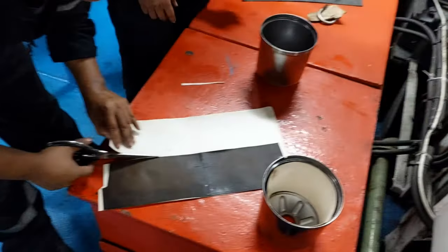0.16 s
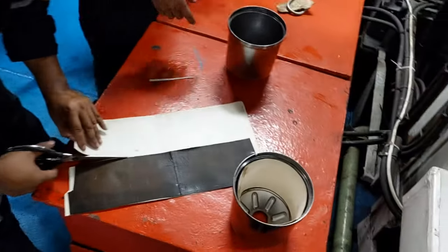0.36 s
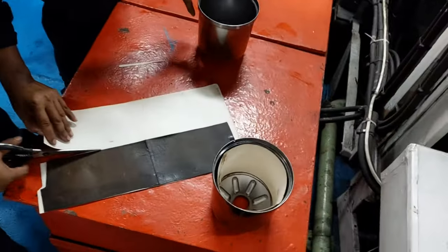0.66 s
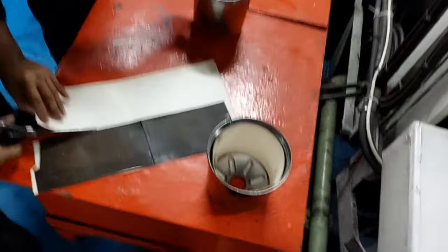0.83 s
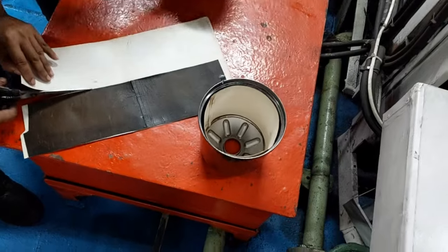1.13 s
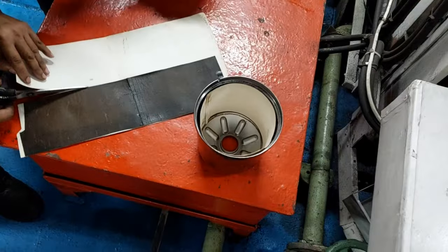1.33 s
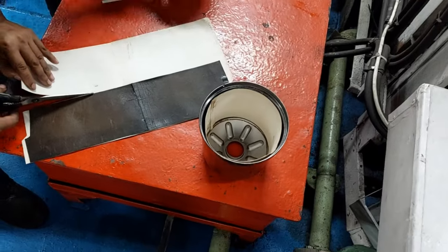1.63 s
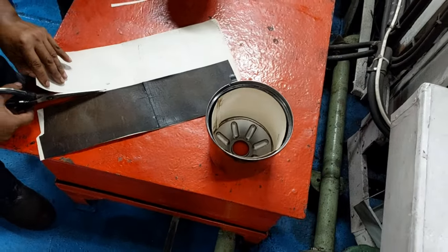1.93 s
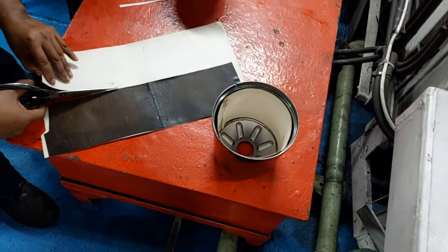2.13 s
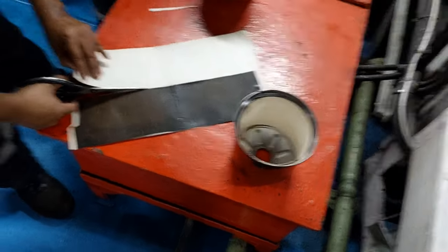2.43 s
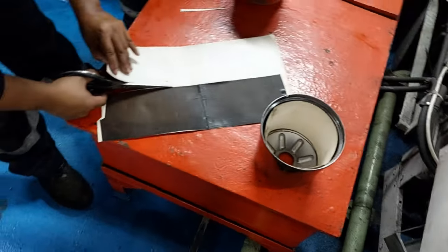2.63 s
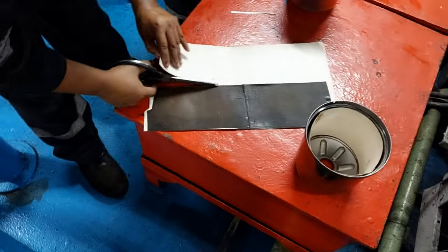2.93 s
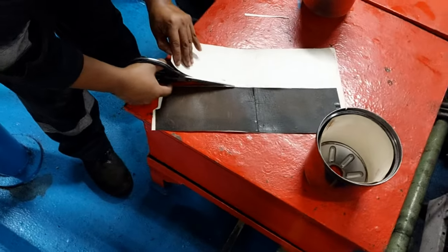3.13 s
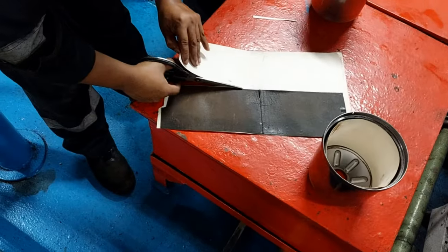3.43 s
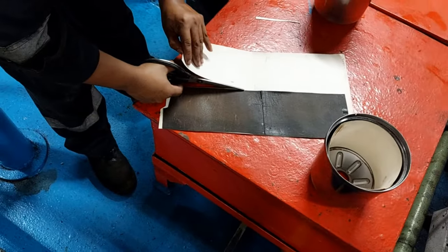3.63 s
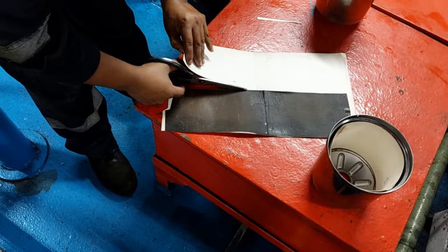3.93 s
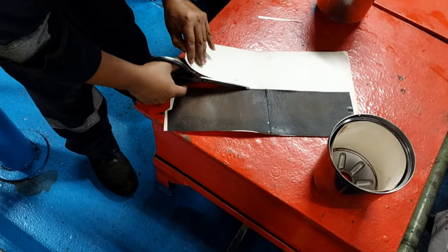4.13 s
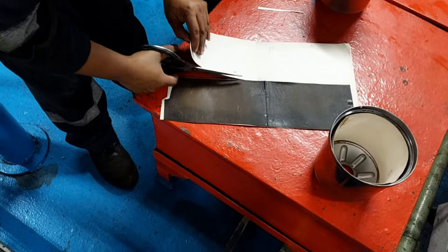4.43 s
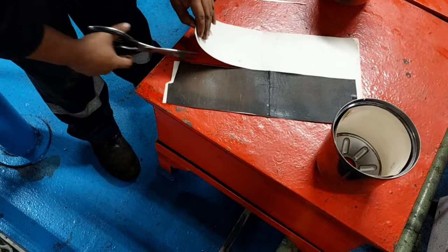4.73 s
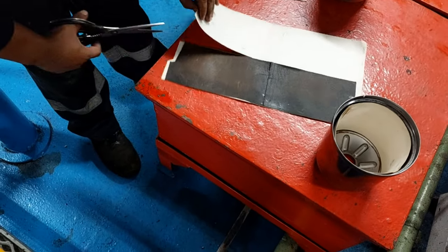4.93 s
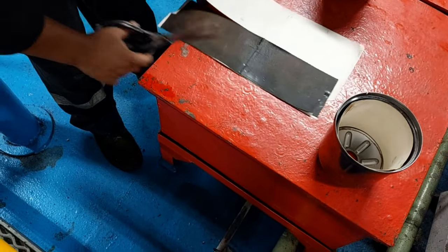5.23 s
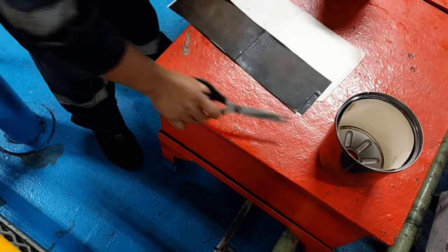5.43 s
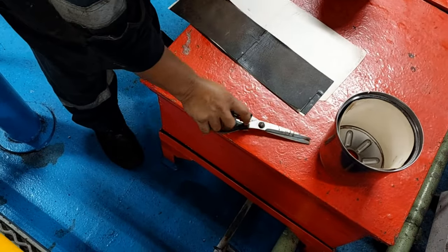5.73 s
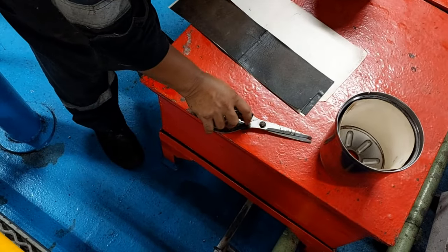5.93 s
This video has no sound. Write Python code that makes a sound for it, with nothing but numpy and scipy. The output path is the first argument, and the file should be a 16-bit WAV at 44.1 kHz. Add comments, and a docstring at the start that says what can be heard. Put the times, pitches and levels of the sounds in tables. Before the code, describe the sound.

Steady machinery roar in a steel room; a few dull scissor bites, thin blade scrapes, a dry sheet slide, then a knock on the bench.

```python
"""A ship's engine room: beating tones and narrow steel-room resonances make a loud low drone under a noise roar.
At a workbench someone cuts a sheet with large scissors: grain bursts crunch and jolt ringing blade modes.
The blades scrape as they reopen (friction grains drive their modes), then the sheet hisses and judders aside.
The scissors are put down with knocks, scuffs and a ringing bench top. A handheld phone with two microphones hears it."""
import sys
import numpy as np
from scipy import signal
from scipy.fft import rfft, irfft
from scipy.io import wavfile
from scipy.ndimage import uniform_filter1d

SR = 44100
rng = np.random.default_rng(int(sys.argv[2]) if len(sys.argv) > 2 else 0)


def transcribe(signal):
    """Save signal, clipped to [-1, 1], as a 16-bit WAV file at the path in sys.argv[1]."""
    frames = np.atleast_2d(signal).T
    limited = np.clip(frames, -1, 1)
    pcm = np.round(limited * 32767).astype(np.int16)
    wavfile.write(sys.argv[1], SR, pcm)


N = 268128
TIME = np.arange(N) / SR
FREQS = np.maximum(np.fft.rfftfreq(N, 1 / SR), 1)
MIC_SPACING_M, SOUND_SPEED_M_S = 0.18, 343


def undb(db):
    """Decibels to gain."""
    return 10 ** (np.asarray(db) / 20)


def unit(x):
    """Scale to rms 1."""
    return x / np.sqrt(np.mean(x ** 2))


def colour(points):
    """Gain at every frequency, interpolated over log frequency from (frequency [Hz], level [dB]) points."""
    hz, db = np.transpose(points)
    return undb(np.interp(np.log(FREQS), np.log(hz), db))


def tint(x, points):
    """Causal minimum-phase filter with the given colour and unit power gain."""
    cepstrum = irfft(np.log(unit(colour(points))), N)
    # fold the cepstrum to positive time
    cepstrum[1:N // 2] *= 2
    cepstrum[N // 2 + 1:] = 0
    response = irfft(np.exp(rfft(cepstrum)), N)[:SR // 100]
    return signal.fftconvolve(x, response[None], axes=1)[:, :N]


def pan(x, db):
    """Lean a stereo sound to the left by db."""
    return x * undb(np.array([[db], [-db]]) / 2)


def walk(rate):
    """Random levels held 1 / rate seconds and slewed twice, rms 1."""
    hold = int(SR / rate)
    held = np.repeat(rng.standard_normal(N // hold + 1), hold)
    slewed = uniform_filter1d(uniform_filter1d(held, hold), hold)
    return unit(slewed[:N])


def grains(spread_db):
    """Dense tiny clicks of unequal size at two microphones, rms 1."""
    size_db = spread_db * np.repeat(rng.standard_normal(N // 20 + 1), 20)[:N]
    return unit(undb(size_db) * rng.standard_normal((2, N)))


def burst(start_s, hold_s, fall_s, rise_s):
    """Envelope that rises linearly and decays exponentially once hold_s has passed from the start."""
    age = TIME - start_s
    decay = np.exp(-np.clip((age - hold_s) / fall_s, 0, 50))
    return np.clip(age / rise_s, 0, 1) * decay


def swell(middle_s, length_s):
    """Envelope of a smooth push: a bell about as wide as its length."""
    return np.exp(-np.minimum(((TIME - middle_s) / length_s) ** 2 * 2, 50))


def ring(x, modes):
    """Drive decaying (frequency [Hz], level [dB], t60 [s]) modes in random phases; unit power gain."""
    t = TIME[:SR // 8]
    response = np.zeros(len(t))
    for hz, db, t60 in modes:
        envelope = undb(db - 60 * t / t60) / np.sqrt(t60)
        response += envelope * np.cos(2 * np.pi * (hz * t + rng.random()))
    return signal.oaconvolve(x, response[None] / np.linalg.norm(response), axes=1)[:, :N]


def strike(start_s, modes, rise_s):
    """Modes set ringing by one jolt; each reaches the two microphones in a slightly different phase."""
    first, out = int(start_s * SR), np.zeros((2, N))
    t = TIME[:min(SR // 4, N - first)]
    for hz, db, t60 in modes:
        phase = rng.random() + rng.random((2, 1)) / 4
        decay = undb(db - 60 * np.maximum(t - rise_s, 0) / t60)
        envelope = np.minimum(t / rise_s, 1) * decay
        out[:, first:first + len(t)] += envelope * np.sin(2 * np.pi * (hz * t + phase))
    return out


# Stereo lean of the room's sound: (frequency [Hz], left minus right [dB])
ROOM_LEAN = [(60, -2.5), (110, 1), (200, -2), (380, 0.5), (700, -1.5), (1290, 1.0), (2380, 2.5), (4400, 0),
             (8120, 3.5), (15000, -5)]


def diffuse(density):
    """Steady sound from all sides: long waves reach both microphones alike, short ones do not."""
    likeness = .975 * np.sinc(2 * FREQS * MIC_SPACING_M / SOUND_SPEED_M_S)
    likeness = np.clip(likeness, -.9, .999)
    mid, side = np.exp(2j * np.pi * rng.random((2, len(FREQS))))
    side = side * np.sqrt((1 - likeness) / (1 + likeness))
    lean = np.sqrt(colour(ROOM_LEAN))
    stereo = np.array([(mid + side) * lean, (mid - side) / lean])
    return irfft(stereo * np.sqrt(density * SR * N / 2), N)


def room_ripple(depth_db=2.0, spacing_hz=11):
    """The many faint resonances of the steel room: a gain that ripples at random over frequency."""
    knots_hz = np.arange(0, SR / 2, spacing_hz)
    ripple = np.interp(FREQS, knots_hz, rng.standard_normal(len(knots_hz)))
    return unit(undb(depth_db * ripple))


# Steady pump and fan tones: (frequency [Hz], nominal rms level [dB])
PUMP_FAN_TONES = [(147.6, -33.5), (157.4, -40.5), (200, -37.5), (228.6, -36.5), (273, -39.5), (310, -39.5),
                  (531.5, -50), (902, -58), (1005, -53.5), (1130, -53), (1198, -58), (1383, -64)]


def machine_tones(throb_db=2, drift_hz=0.51, pan_db=-3.0):
    """Pumps and fans hold drifting, throbbing tones; higher ones reach the microphones more out of step."""
    out = 0
    for hz, db in PUMP_FAN_TONES:
        lag_s = np.array([[0], [rng.uniform(-1, 1) * MIC_SPACING_M / SOUND_SPEED_M_S]])
        turns = np.cumsum(hz + drift_hz * walk(rate=2.97)) / SR + rng.random() - hz * lag_s
        throbbing = np.sin(2 * np.pi * turns) * undb(throb_db * walk(rate=14))
        out = out + undb(db) * unit(throbbing)
    return pan(out, pan_db)


# Slowly swelling bands: (frequency [Hz], width [Hz], depth [dB], time of one peak [s], period [s])
SWELLING_BANDS = [(150, 19, 2.5, 2.88, 1.89), (197, 32, 0.5, 1.87, 0.94), (230, 30, 1.5, 3.04, 2.57),
                  (318.5, 15, 4, 4.16, 7.7), (590, 47, 2, 1.7, 5.8)]


def swelling_bands(x):
    """Some narrow bands of the drone and roar slowly swell and fade, each at its own period."""
    spectrum = rfft(x)
    for hz, width_hz, depth_db, peak_s, period_s in SWELLING_BANDS:
        band = irfft(spectrum * np.exp(-((FREQS - hz) / width_hz * 2) ** 4), N)
        swell_db = depth_db * np.cos(2 * np.pi * (TIME - peak_s) / period_s)
        x = x + band * (undb(swell_db) - 1)
    return x


# Room and plating resonances driven by the machines: (frequency [Hz], width [Hz], nominal rms level [dB])
ROOM_RESONANCES = [(51.4, 4, -40), (106.4, 4.5, -38.5), (113.5, 7.4, -33.5), (136.2, 6.8, -35),
                   (147.2, 4.9, -34), (157.2, 5.9, -31.5), (169.5, 7, -34), (191, 19, -37.5),
                   (205, 6.7, -35.5), (215.6, 4.4, -37), (234, 10.7, -30.5), (255, 30, -45),
                   (258.5, 3.9, -38), (278.2, 6, -39.5), (284, 2.6, -41), (305.3, 11, -43),
                   (315.4, 9.3, -34), (324.9, 6, -38), (354.6, 34, -40), (387.7, 6.5, -47),
                   (411.5, 10, -46.5), (479.5, 13, -50), (535.5, 23, -48.5), (604.4, 41, -42.5),
                   (715, 28, -54), (907, 73, -47.5), (939, 22, -53), (1065, 88, -54.5), (1134, 44, -50.5)]
# Broad roar of machines and air: (frequency [Hz], nominal level per Hz [dB])
ROAR_SPECTRUM = [(25, -59), (45, -59.5), (66, -47), (90, -52), (130, -53), (260, -50), (340, -57.5),
                 (440, -62.5), (800, -68.5), (1000, -69.5), (2400, -81), (6000, -95.5), (9500, -101.6),
                 (12500, -100.5), (15500, -103.9)]
# The drone and roar start low and come up to their steady levels
SETTLE_S, SETTLE_DRONE_DB, SETTLE_ROAR_DB = 0.68, -3.5, -1


def machinery(flutter_db=.5, wander_db=0.66):
    """Machine tones and narrow room resonances beat against each other over a broad, slightly fluttering roar."""
    unsettled = np.clip(1 - TIME / SETTLE_S, 0, 1)
    density = 0
    for hz, width_hz, db in ROOM_RESONANCES:
        bell = np.exp(-np.pi * ((FREQS - hz) / width_hz) ** 2)
        density = density + undb(db) ** 2 / width_hz * bell
    drone = (diffuse(density) + machine_tones()) * undb(SETTLE_DRONE_DB * unsettled)
    roar_db = SETTLE_ROAR_DB * unsettled + wander_db * walk(rate=1.713) + flutter_db * walk(rate=18)
    roar = diffuse((colour(ROAR_SPECTRUM) * room_ripple()) ** 2) * undb(roar_db)
    return swelling_bands(drone + roar)


# Level of the low hum as close tones interfere, before level_db and flicker: (time [s], level [dB])
HUM_INTERFERENCE = [(0.0, -43), (0.08, -28), (0.63, -47), (0.69, -25), (1.08, -20), (1.34, -36),
                    (1.39, -45), (1.45, -25), (2.32, -38.5), (2.56, -24), (2.64, -25.5), (2.71, -24),
                    (2.79, -31), (2.84, -23), (3.13, -28.5), (3.2, -41), (3.27, -35), (3.62, -23.5),
                    (3.71, -37), (3.81, -46), (3.89, -22.5), (4.08, -21), (4.13, -32), (4.3, -32),
                    (4.38, -47), (4.47, -19), (4.52, -41), (4.61, -24), (4.67, -48), (4.76, -29.5),
                    (5.23, -27.5), (5.27, -36), (5.5, -27), (5.55, -36), (5.89, -25.5), (6.08, -29)]
HUM_HZ = 71.8


def hum(level_db=-1.0, flicker_db=0.8, drift_hz=0.4, pan_db=-2.0):
    """A low hum near 72 Hz, swelling and dipping irregularly as close tones interfere: one sine on a level curve."""
    tone = np.sin(2 * np.pi * np.cumsum(HUM_HZ + drift_hz * walk(rate=2.71)) / SR)
    interference_db = np.interp(TIME, *np.transpose(HUM_INTERFERENCE))
    return pan(unit(tone) * undb(level_db + interference_db + flicker_db * walk(rate=22)), pan_db)


def reflections(x, t60_s=0.25, wet_db=-7):
    """Nearby steel surfaces add a short dense tail of decaying noise."""
    t = TIME[:SR // 2]
    tail = rng.standard_normal((2, len(t))) * undb(-60 * t / t60_s) * (t > .004)
    tail /= np.linalg.norm(tail, axis=1, keepdims=True)
    return x + undb(wet_db) * signal.fftconvolve(x, tail, axes=1)[:, :N]


# Scissors touch the bench, then drop flat: (time [s], knock level [dB], scuff level [dB])
BENCH_KNOCKS = [(5.776, -34, -42), (5.801, -39, -36), (5.826, -38, -45), (5.9424, -19.5, -36),
                (5.9476, -30, -46), (5.957, -38, -48)]
# Bench-top ringing: (frequency [Hz], relative level [dB], t60 [s])
BENCH_RINGING = [(307, -1, 0.18), (485, 1, 0.1), (644, -7, 0.1), (925, -8, 0.071), (1436, 2, 0.032),
                 (1660, -11, 0.037), (1990, -12, .05), (2160, -9, 0.045), (3120, -20, .05)]
# Colour of a knock on the bench: (frequency [Hz], relative level [dB])
KNOCK_SPECTRUM = [(150, -5), (350, 4), (600, 4), (850, 6), (1150, 0), (1500, 3), (2200, -1), (2700, -9),
                  (3500, -8.5), (6000, -36), (9000, -33), (12000, -23), (16000, -29)]
# Colour of steel scuffing over paint: (frequency [Hz], relative level [dB])
SCUFF_SPECTRUM = [(500, -10), (3000, 13), (4800, 11), (6300, -2), (10000, -11), (13000, -12), (15500, -7)]


def put_down(contact_s=0.0076, attack_s=.0005, bench_db=-4, pan_db=-0.5):
    """The scissors knock and scuff on the bench, whose top rings briefly."""
    knock, scuff, bench = 0, 0, 0
    for s, knock_db, scuff_db in BENCH_KNOCKS:
        touch = burst(s, 0, contact_s, attack_s)
        knock = knock + undb(knock_db) * touch
        scuff = scuff + undb(scuff_db) * touch
        bench = bench + undb(knock_db + bench_db) * strike(s, BENCH_RINGING, attack_s)
    contact = grains(spread_db=3)
    knocking = tint(contact * knock, KNOCK_SPECTRUM) + bench
    return pan(knocking, pan_db) + tint(contact * scuff, SCUFF_SPECTRUM)


# Pushes of the sheet: (middle time [s], length [s], hiss level [dB], judder level [dB])
SHEET_PUSHES = [(0.832, .08, -51, -80), (4.545, .16, -57, -80), (4.848, 0.17, -52.5, -80),
                (5.11, 0.14, -51, -49), (5.206, 0.077, -52.5, -68), (5.4, 0.26, -49.5, -58)]
# Resonances of the dragging sheet: (frequency [Hz], relative level [dB], t60 [s])
SHEET_RINGING = [(2380, 3.5, 0.035), (3550, 2, 0.061), (3780, -4, .025), (4570, -4, .025),
                 (5050, -11, .015)]
# Colour of dry rubbing, sheet and blades alike: (frequency [Hz], relative level [dB])
RUB_SPECTRUM = [(500, -12), (2000, 9), (3500, -1), (4800, 7), (6500, -3), (9500, -2), (12500, -0.5),
                (15500, -5)]


def sheet(unevenness_db=0.3, pan_db=-2):
    """The sheet hisses and judders as it is pushed over the painted bench; judder drives its resonances."""
    hiss = sum(undb(db) * swell(s, length_s) for s, length_s, db, _ in SHEET_PUSHES)
    hiss = hiss * undb(unevenness_db * walk(rate=45)) * grains(spread_db=3.5)
    judder = sum(undb(db) * swell(s, length_s) for s, length_s, _, db in SHEET_PUSHES)
    judder = judder * grains(spread_db=2)
    return pan(tint(hiss, RUB_SPECTRUM), pan_db) + ring(judder, SHEET_RINGING)


# Edges catch and let go: (time [s], level before catch_db [dB])
EDGE_CATCHES = [(1.058, -34), (1.132, -36), (1.1405, -35), (1.153, -42), (1.2424, -37), (1.2795, -48),
                (1.3495, -35), (1.3545, -38), (1.3865, -30), (1.397, -37), (1.431, -29), (1.446, -32),
                (1.4847, -35), (1.5219, -32), (1.531, -36)]
# Edge slides on edge as the scissors reopen: (start time [s], length [s], nominal level [dB])
EDGE_SCRAPES = [(1.126, 0.046, -52), (1.265, 0.08, -56), (1.339, 0.18, -47)]
SCRAPE_RISE_S, SCRAPE_FALL_S = 0.022, 0.032
# Steel blade ringing: (frequency [Hz], relative level [dB], t60 [s])
BLADE_RINGING = [(4110, -2, .04), (4360, 3, 0.053), (4850, 3, .025), (5140, 2, .025), (5480, -4, .02),
                 (6760, -2, .03), (7000, -5, .03), (7800, 1.5, .05), (8200, -1, .02), (9733, -4, .04),
                 (10700, -5, .04), (10700, -2, .07), (12420, -5, .03), (13450, -5, .04)]
# One blade mode sings out for a moment: (time [s], nominal level [dB], frequency [Hz])
BLADE_GLINTS = [(1.156, -56, 7875), (1.273, -50, 7875), (1.387, -48, 10735), (1.393, -39.5, 4310),
                (1.431, -54, 10735), (1.443, -44, 7860)]


def blades(catch_db=-9, catch_s=0.0061, hiss_db=0.2, ring_db=-14.5, contact_db=4,
           glint_rise_s=0.0064, glint_t60_s=0.14, rasp_db=2.0, pan_db=-1.0):
    """Steel rubs and catches on steel and rings the blades; at times one mode glints, broken by the rasp."""
    catches = sum(undb(db + catch_db) * burst(s, 0, catch_s, rise_s=0.003) for s, db in EDGE_CATCHES)
    sliding = sum(undb(db) * burst(s, length_s, SCRAPE_FALL_S, SCRAPE_RISE_S)
                  for s, length_s, db in EDGE_SCRAPES)
    friction = (sliding * undb(1.9 * walk(rate=160)) + catches) * grains(spread_db=2.0)
    ringing = 0
    for hz, db, t60 in BLADE_RINGING:
        # contact runs along the edge, past the mode's nodes and crests
        drive_db = db + contact_db * np.tanh(walk(rate=61))
        ringing = ringing + ring(friction * undb(drive_db), [(hz, 0, t60)])
    glints = sum(strike(s, [(hz, db, glint_t60_s)], glint_rise_s) for s, db, hz in BLADE_GLINTS)
    glints = glints * unit(undb(rasp_db * walk(rate=310)))
    rubbing = undb(hiss_db) * tint(friction, RUB_SPECTRUM)
    return pan(rubbing + undb(ring_db) * ringing + glints, pan_db)


# Blade strokes through the sheet; bite ring frequency depends on where along the edge they bite:
# (time [s], crunch level [dB], attack [s], bite length [s], tilt [dB/octave],
#  ring level [dB], bite ring frequency [Hz])
SNIP_STROKES = [(0.625, -30, 0.0035, 0.009, 1.5, -35, 2330), (0.672, -25.5, 0.0008, 0.0067, 2.5, -30, 2190),
                (1.561, -33, .003, 0.014, 5, -29.5, 2150), (2.7638, -32.5, .002, .005, 1, -35, 1450),
                (2.786, -34.5, .002, 0.007, 2.5, -39, 2300), (2.8112, -29.5, .004, 0.014, 2.5, -27, 1630),
                (3.7026, -30, 0.0012, 0.006, 0, -33.5, 1800), (3.750, -30.5, 0.0046, 0.011, 2.5, -37, 2700),
                (4.441, -37, .002, 0.0046, 2, -37.5, 1550)]
# Colour of a snip before tilt: (frequency [Hz], relative level [dB])
SNIP_SPECTRUM = [(200, -17), (600, 11.5), (1050, 10), (1700, 7), (2400, 2.5), (2800, -1), (3400, -4),
                 (4200, -9), (5100, -11.5), (6500, -20.5), (10000, -25.5), (12000, -22), (16000, -35)]
# Scissors ringing when jolted by a bite: (frequency [Hz], relative level [dB], t60 [s])
SNIP_RINGING = [(906, -2, 0.042), (1089, 1.5, 0.053), (1644, -8, .05), (2157, -12, 0.045),
                (2490, -11, 0.064), (3100, -12, .07), (3380, -11, 0.047), (4370, -16, 0.049),
                (4820, -23, .03), (5380, -21, 0.022)]


def snips(fall_s=0.0094, bite_ring_db=2, bite_t60_s=0.043, pivot_hz=1600, pan_db=2):
    """Each bite breaks a short run of fibres and jolts the scissors; one ring shifts with the place of the bite."""
    fibres, out = grains(spread_db=1.5), 0
    for s, crunch_db, attack_s, length_s, tilt_db, ring_db, bite_hz in SNIP_STROKES:
        spectrum = [(hz, db + tilt_db * np.log2(hz / pivot_hz)) for hz, db in SNIP_SPECTRUM]
        crunch = undb(crunch_db) * burst(s, length_s, fall_s, attack_s) * fibres
        modes = SNIP_RINGING + [(bite_hz, bite_ring_db, bite_t60_s)]
        out = out + tint(crunch, spectrum) + undb(ring_db) * strike(s, modes, attack_s)
    return pan(out, pan_db)


def scene():
    """Small handwork inside the drone; only the handwork gets the added reflections."""
    handwork = put_down() + sheet() + blades() + snips()
    return machinery() + hum() + reflections(handwork)


def record(dry, rumble_hz=32, top_hz=15450):
    """The phone cuts the deepest rumble and the top."""
    dry = signal.sosfilt(signal.butter(6, rumble_hz, "highpass", fs=SR, output="sos"), dry)
    return signal.sosfilt(signal.ellip(10, .1, 80, top_hz, fs=SR, output="sos"), dry)


dry = scene()
out = record(dry)
transcribe(out)
```